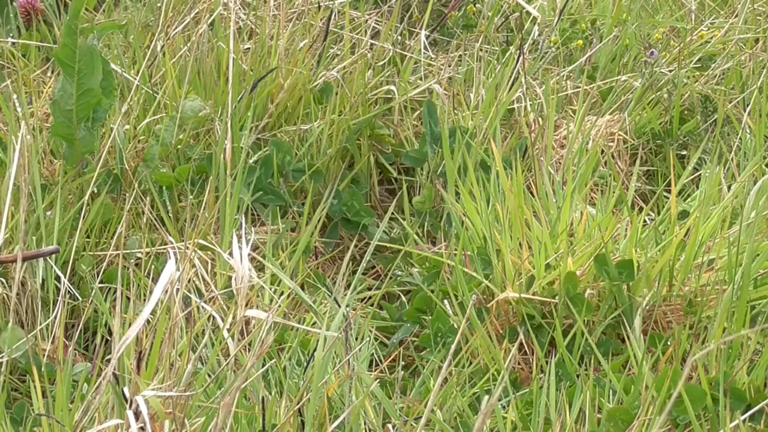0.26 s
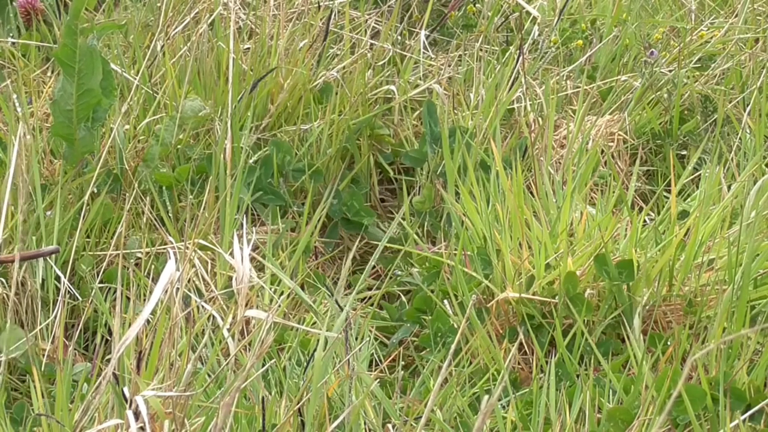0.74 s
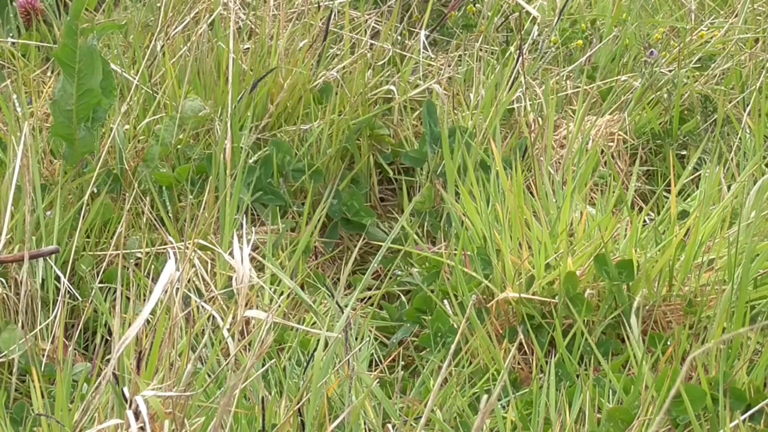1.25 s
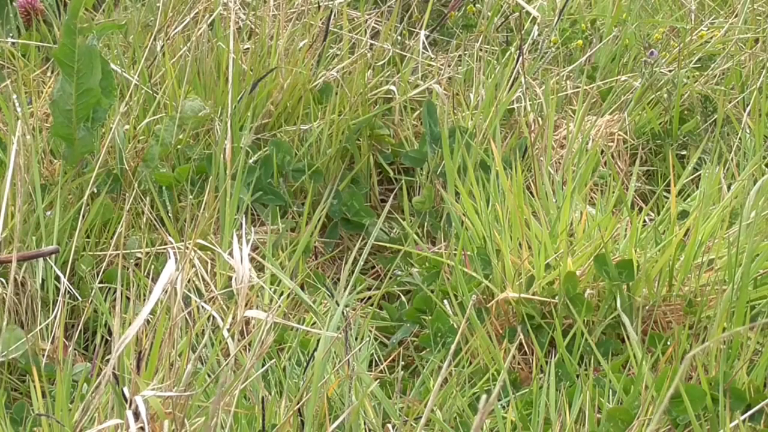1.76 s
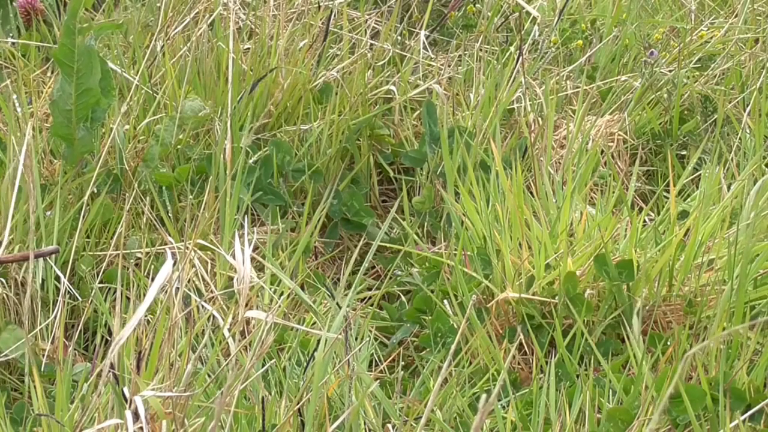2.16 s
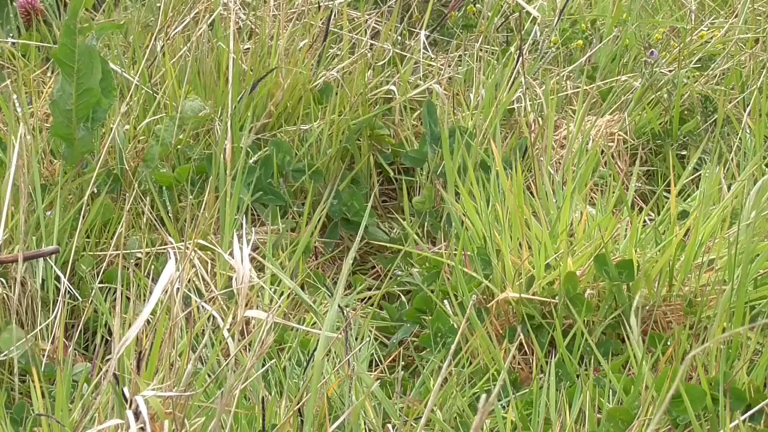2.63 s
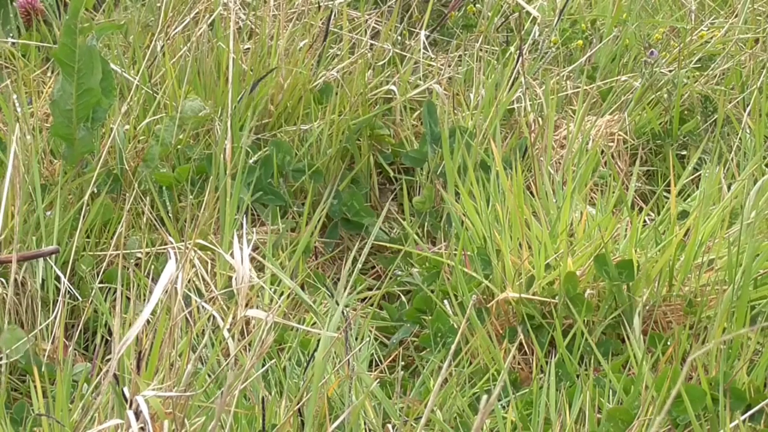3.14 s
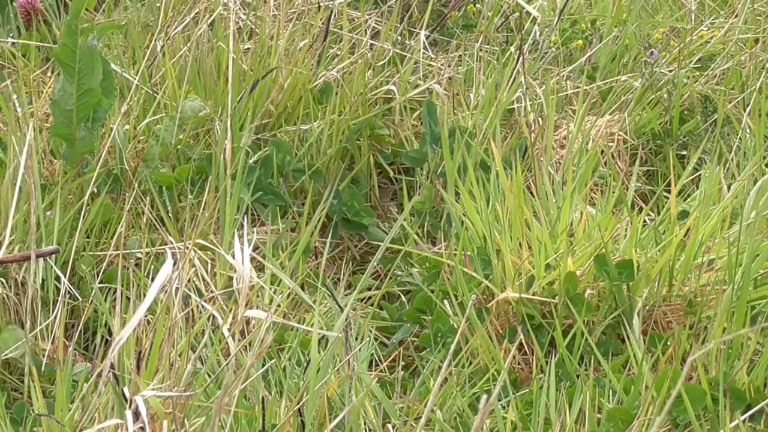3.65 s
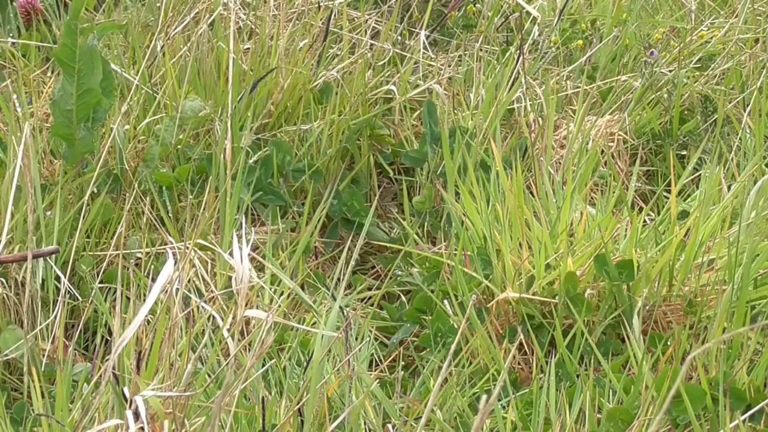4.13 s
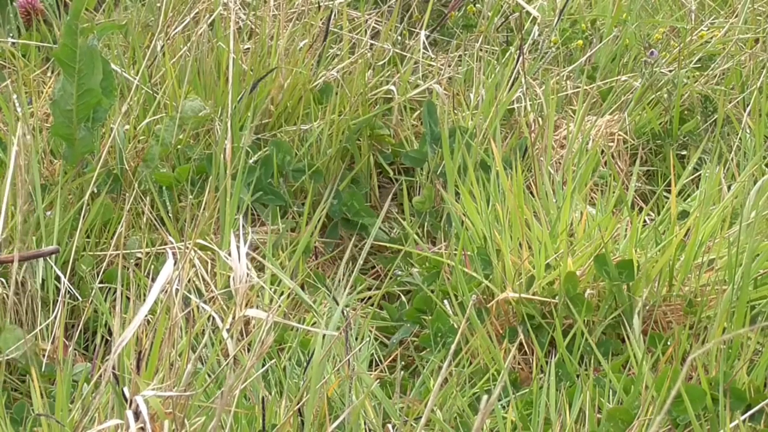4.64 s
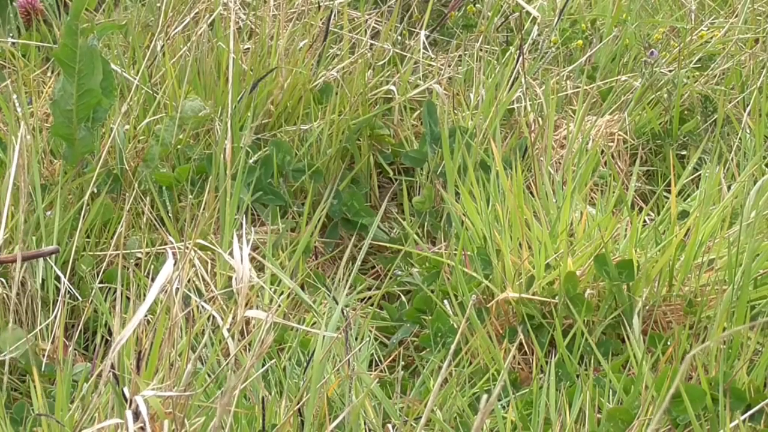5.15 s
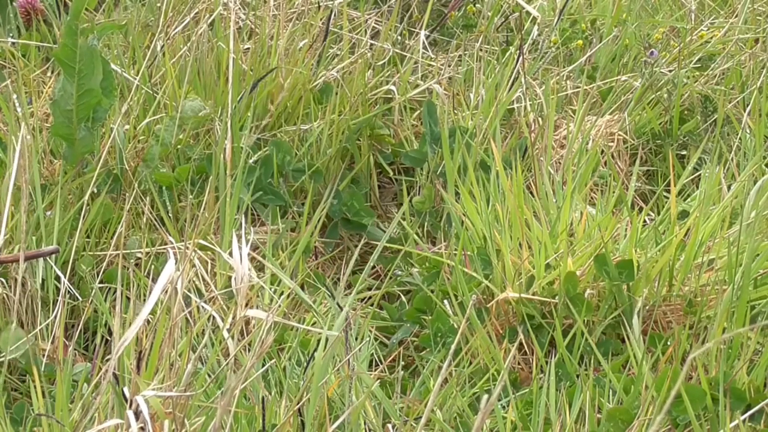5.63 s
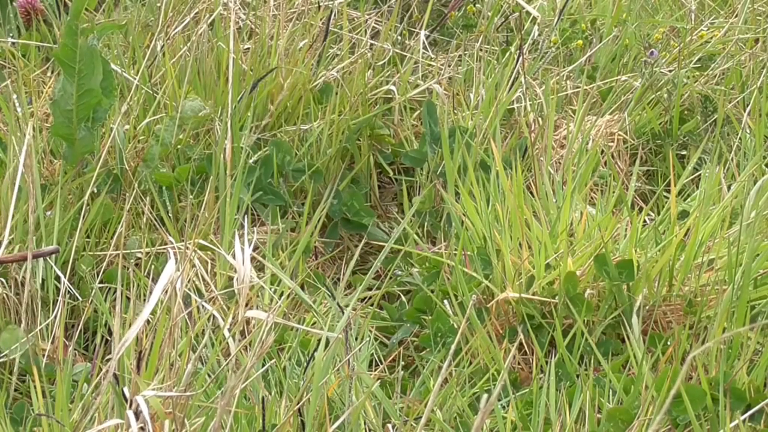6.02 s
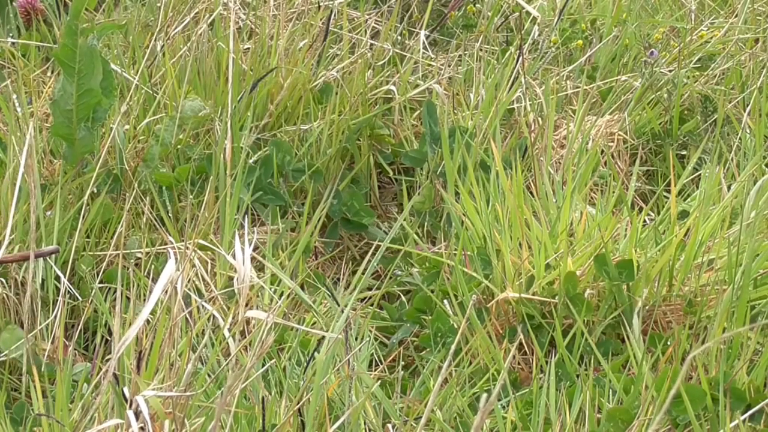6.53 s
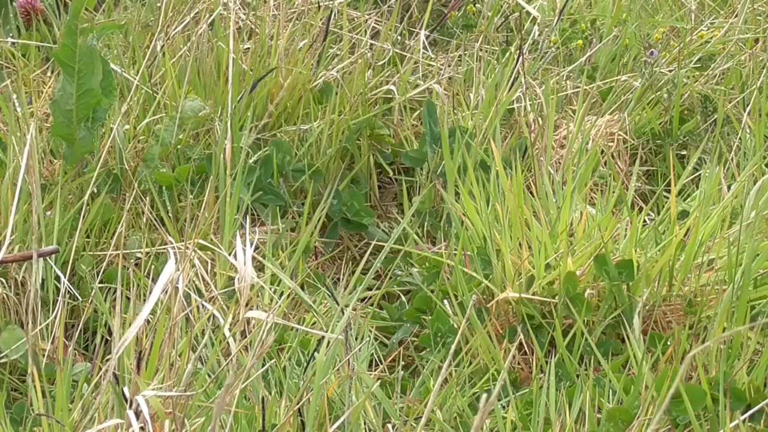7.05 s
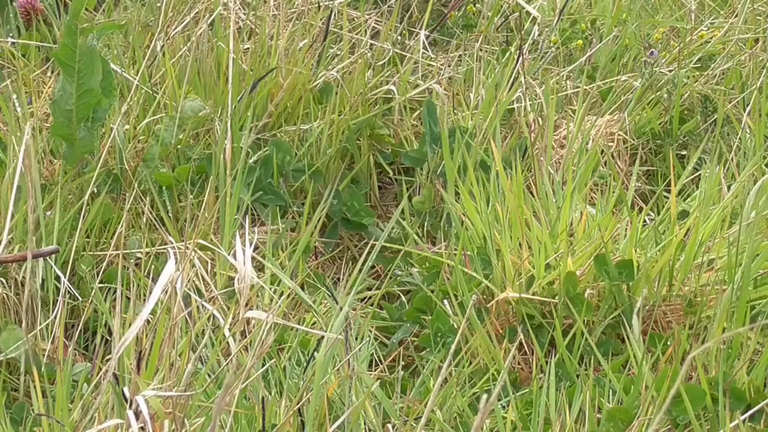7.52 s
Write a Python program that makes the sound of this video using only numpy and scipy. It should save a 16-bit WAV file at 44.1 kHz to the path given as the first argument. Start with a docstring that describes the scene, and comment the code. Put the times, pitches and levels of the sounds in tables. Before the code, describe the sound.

A lark sings fast trills and warbles over an open meadow, with low wind rumble and one strong gust on the microphone.

```python
"""Lark over a windy meadow

A lark whistles fast trills, slides and buzzes with its syrinx, a bird's voice box. A second bird
answers faintly from further off, and the grass scatters both songs. Distant air and grass hiss
below, and wind rumbles on the two microphone openings, with one strong gust."""
import sys
import numpy as np
from scipy import signal
from scipy.fft import rfft, irfft
from scipy.io import wavfile
from scipy.ndimage import uniform_filter1d

SR = 44100
rng = np.random.default_rng(int(sys.argv[2]) if len(sys.argv) > 2 else 0)


def wrap_up_sound(samples):
    """Save the sound to the file named by the first command line argument, as 16-bit audio."""
    columns = np.atleast_2d(samples).T
    # keep every value between -1 and 1, then stretch to whole-number steps
    tamed = np.clip(columns, -1, 1)
    steps = np.round(tamed * 32767).astype(np.int16)
    wavfile.write(sys.argv[1], SR, steps)


N = 343098
TIME = np.arange(N) / SR
BINS_HZ = np.maximum(np.arange(N // 2 + 1) * SR / N, 1)


def amp(db):
    """Turn a level in dB into a gain."""
    return 10 ** (np.asarray(db) / 20)


def at_hz(table, hz, column=1):
    """Read a table between its rows, on a log-frequency scale."""
    rows = np.array(table)
    return np.interp(np.log(hz), np.log(rows[:, 0]), rows[:, column])


def noise(spectrum, channels=2):
    """Noise of strength 1, shaped by a gain for each frequency."""
    shaped = irfft(spectrum * rfft(rng.standard_normal((channels, N))), N)
    return shaped / shaped.std()


def random_gain(rate_hz, depth_db):
    """A gain that wavers at random."""
    return amp(depth_db * noise(1 / (1 + (BINS_HZ / rate_hz) ** 2), channels=1)[0])


# Each row: frequency in Hz, relative strength of the hiss in dB.
AIR_SPECTRUM = [(260, -35), (450, -6.5), (900, -4), (1300, -9), (1760, -17.5), (2300, -15.5), (2800, -23.5),
                (4200, -22), (6000, -32), (8200, -21.5), (15600, -24.5)]
# Each row: frequency in Hz, left minus right in dB, likeness from 0 to 1, right's lead in radians.
AIR_STEREO = [(580, 3.5, 0.46, 1.9), (950, 1.5, 0.76, 1.7), (2040, -0.5, 0.16, 1.09), (7840, 1.5, 0, 13.3)]


def air(level_db=-60):
    """Distant air and grass hiss, partly alike in the left and right ears."""
    own, right = rfft(rng.standard_normal((2, N))) * amp(at_hz(AIR_SPECTRUM, BINS_HZ))
    alike = np.clip(at_hz(AIR_STEREO, BINS_HZ, column=2), 0, 1)
    lag = np.exp(-1j * at_hz(AIR_STEREO, BINS_HZ, column=3))
    left = amp(at_hz(AIR_STEREO, BINS_HZ)) * (alike * lag * right + np.sqrt(1 - alike ** 2) * own)
    hiss = irfft(np.array([left, right]), N)
    return amp(level_db) * hiss / hiss[1].std()


# Each row: time in seconds, rumble level in dB, whoosh level in dB, both on the left.
BREEZE_LEVELS = [(0, -58, -58), (.65, -49, -49), (1.4, -56.5, -55), (4.2, -53, -54), (4.8, -53.5, -49),
                 (7.2, -52, -50.5), (7.78, -52, -55)]
# Each row: frequency in Hz, relative strength of the rumble in dB.
RUMBLE_SPECTRUM = [(25, -19), (60, 4), (180, 7.5), (300, -11), (1500, -93)]


def breeze(hollow_hz=343.5, width_hz=95):
    """Swirling air rumbles at the microphone openings and whooshes in their hollows, mostly on the left."""
    times, rumble_db, whoosh_db = np.transpose(BREEZE_LEVELS)
    hollow = 1 / (1 + ((BINS_HZ - hollow_hz) / width_hz) ** 4)
    rumble = noise(amp(at_hz(RUMBLE_SPECTRUM, BINS_HZ))) * amp(np.interp(TIME, times, rumble_db))
    whoosh = noise(hollow) * amp(np.interp(TIME, times, whoosh_db)) * random_gain(8.6, 1.74)
    left, right = rumble * random_gain(5, 1.5) + whoosh
    return np.array([left, .095 * left + .36 * right])


def breathy_tone(hz=1420, width_hz=120, level_db=-60, end_s=.22):
    """A narrow band of noise fades out at the very start."""
    band = noise(1 / (1 + ((BINS_HZ - hz) / width_hz) ** 2))
    return amp(level_db) * np.clip(1 - TIME / end_s, 0, 1) ** .5 * band


# Each row: the overtone's frequency in Hz, its level against the note in dB.
LARK_OVERTONE = [(6200, -46), (10000, -21)]


def whistle(out, start, hz, level_db, overtone=LARK_OVERTONE):
    """The syrinx makes an almost pure tone, which is weaker and lags a little on the left."""
    first = int(start * SR)
    size = min(len(hz), N - first)
    hz, age = hz[:size], np.arange(size)
    gain = amp(level_db[:size]) * np.clip(np.minimum(age, size - age) / (.00084 * SR), 0, 1)
    phase = 2 * np.pi * np.cumsum(hz) / SR + rng.uniform(0, 2 * np.pi)
    left_db = at_hz([(2200, -7.5), (4500, -4.5)], hz)
    for side, lag_radians, side_db in ((0, 1.87, left_db), (1, .025, .097)):
        wave = np.sin(phase - lag_radians) + amp(at_hz(overtone, 2 * hz)) * np.sin(2 * phase - lag_radians)
        out[side, first:first + size] += gain * amp(side_db) * wave


def stroke(out, start, length, from_hz, to_hz, level_db, hook=0, curve=1, dim_db_per_semitone=0):
    """One breath of song: a quick bend in pitch, the hook, settles into a slide."""
    attack_s, release_s, hook_s = min(.0025, length / 2), min(.0035, length / 2), .001 + .07 * length
    t = np.arange(1, max(int(length * SR), 9)) / SR
    slide_hz = from_hz * (to_hz / from_hz) ** ((t / length) ** curve)
    hz = slide_hz * 2 ** (hook * np.exp(-t / hook_s) / 12)
    edge = np.clip(np.minimum(t / attack_s, (length - t) / release_s), 1e-4, 1)
    fade_db = 20 * np.log10(np.sin(np.pi / 2 * edge))
    semitones_below_top = 12 * np.log2(hz.max() / hz)
    whistle(out, start, hz, level_db + fade_db - dim_db_per_semitone * semitones_below_top)


def pitch_path(progress, first, middle, last):
    """Deep falls bend smoothly, levelling off or steepening; other trills follow an arc."""
    if first > 1.16 * last and first > middle > last:
        bend = 2 * np.log(np.log(first / middle) / np.log(middle / last)) + 1e-6
        return first * (last / first) ** (np.expm1(-bend * progress) / np.expm1(-bend))
    arc = np.polyfit([0, .5, 1], np.log([first, middle, last]), 2)
    return np.exp(np.polyval(arc, progress))


# Whatever starts in these spans is sung twice. Each row: start in seconds, end in seconds.
REPEAT_SPANS = [(1.2, 1.25), (1.48, 1.6), (4.16, 4.2), (4.64, 4.7)]
# For each span: how many seconds later its twin is sung (negative means earlier).
REPEAT_SHIFTS = [1.231, 1.232, .374, -0.378]


def with_repeats(rows):
    """Pair each row with a time shift of zero, then add the shifted repeats."""
    repeats = [(row, shift) for (start, end), shift in zip(REPEAT_SPANS, REPEAT_SHIFTS)
               for row in rows if start < row[0] < end]
    return [(row, 0) for row in rows] + repeats


# Each row: start and end in seconds, number of strokes, hurry (how early the middle comes, as a share
# of the trill), first, middle and last pitch in Hz, first and last level in dB, share of each beat that
# sounds, first and last slide in semitones, hook in semitones.
# Rows that overlap are the two sides of the syrinx taking turns.
LARK_TRILLS = [ (.037, 0.059, 3, 0, 4610, 4570, 4650, -33.5, -31, 0.91, 2, -0.5, 0),
               (0.07, 0.179, 6, 0.015, 4960, 4460, 3450, -35, -34, 0.57, -1, -1.5, 0),
               (0.218, 0.373, 8, -0.00097, 3900, 3980, 3830, -34.5, -34.5, 0.67, -1, -1.5, -1.5),
               (.444, 0.478, 5, 0.0056, 2750, 2800, 2800, -45.5, -41, 0.87, 8, 9, 0),
               (0.49, 0.529, 3, 0, 4030, 4130, 3760, -33, -36, 0.54, 1, -1, -0.5),
               (0.536, .617, 4, 0.019, 2990, 2140, 1850, -39, -51.5, 0.42, -2.5, -2, 3),
               (0.656, .931, 13, 0.0039, 4520, 4950, 4880, -39, -36, .33, .5, .2, -2.5),
               (0.663, .915, 12, -0.0011, 3670, 3980, 3940, -44.5, -42.5, 0.64, -5, -6.5, 0),
               (1.205, 1.229, 3, 0, 4350, 4220, 4150, -41.5, -41, 0.8, .7, -.7, -1),
               (1.239, 1.424, 12, 0, 3750, 3200, 3100, -41, -41, .55, 2, .3, -2.5),
               (1.246, 1.43, 12, 0, 3300, 2850, 2750, -56, -43, .35, -4, -6, 0),
               (1.627, 1.935, 9, -0.0034, 4080, 4680, 4870, -40, -35.5, 0.23, 1.8, .8, -1),
               (1.636, 1.944, 9, -0.004, 3890, 4590, 4820, -41, -42.5, 0.46, .7, .2, -3.5),
               (1.968, 2.072, 6, 0.0023, 3920, 2354, 2090, -38, -47.5, 0.65, 2, 0, 0),
               (2.867, 3.16, 9, -0.016, 4000, 4780, 4980, -37, -37, .23, 2.5, .8, -1.5),
               (2.876, 3.166, 9, -0.014, 3920, 4780, 4860, -39, -42, 0.46, 1, -.5, -4),
               (3.2, 3.322, 7, 0.032, 4150, 2350, 2110, -39, -48, 0.7, 2.5, -1.5, 0.5),
               (3.424, 3.498, 4, 0, 4130, 4020, 3930, -47, -44, 0.45, 5.5, 4, -0.5),
               (3.432, 3.486, 3, 0, 5040, 5020, 5050, -47, -40.5, .5, -1.5, -1.5, 1.5),
               (3.503, 3.712, 13, 0.016, 4790, 3470, 2550, -37, -44, 0.65, -0.5, 1, -1),
               (3.798, 4.12, 6, -0.0068, 2770, 2825, 2920, -48.5, -50, 0.66, -0.2, -1.2, 0.5),
               (3.832, 4.103, 5, -0.026, 3300, 3650, 3650, -46, -45, .09, 8, 9, 0),
               (3.836, 4.107, 5, -0.026, 3830, 4000, 3980, -42, -41, .22, -1.5, -2.5, 2.5),
               (4.17, 4.252, 4, -0.0021, 3020, 2650, 2380, -43.5, -41, 0.27, -2, -5, 0.5),
               (4.177, 4.256, 4, -0.0077, 3030, 2650, 2250, -38, -47, .3, -5.5, -2, 2),
               (4.892, 5.148, 15, 0.0056, 3384, 3203, 2974, -41, -42, 0.82, 0, 0.5, -0.5),
               (5.212, 5.274, 6, 0.025, 4310, 4370, 4450, -42, -37.5, 1, 3.5, .5, -2),
               (5.315, 5.351, 4, 0, 3520, 3540, 3410, -41.5, -38.5, .8, 1.5, 1.5, 0.5),
               (5.701, 5.73, 3, 0, 3440, 3410, 3220, -43.5, -39.5, 0.77, 1, 3, 1),
               (5.735, 5.819, 5, 0, 3040, 2650, 2370, -44, -46.5, 0.65, 6, 5.5, 0),
               (5.925, 5.953, 3, 0, 4270, 3900, 3700, -42.5, -37, 0.72, 4, -1.5, -0.5),
               (5.956, 6.292, 18, 0.041, 3620, 3270, 2850, -34, -52, .45, .5, 4, -7),
               (6.051, 6.286, 12, 0.012, 2750, 2420, 2280, -45, -44, .52, 6.5, 9, 0),
               (6.348, 6.444, 9, 0.0023, 5000, 5020, 5030, -43, -43.5, 0.87, -.5, -2, -1),
               (6.521, 6.577, 5, -0.024, 4080, 3580, 3750, -41, -36, .5, -9, -10, -1),
               (6.643, 6.725, 7, 0, 5500, 5140, 4930, -49.5, -42, 0.9, 2.5, 2.5, 0.5),
               (6.795, 6.84, 3, -0.0097, 5140, 4940, 4870, -39.5, -42.5, 0.85, 0.5, -1, 0),
               (6.847, 6.954, 5, -0.008, 4700, 4390, 4350, -32, -35, 0.37, -2, -5.5, 0),
               (6.987, 7.206, 13, -0.00056, 4890, 4554, 4110, -38, -40.5, 0.77, .5, 1, -1),
               (7.267, 7.389, 5, -0.025, 3060, 4180, 4210, -40.5, -43, 0.97, -2.5, -2, -0.5), ]
UNEVEN_DB, UNEVEN_SEMITONES = 1.56, .1


def lark_trills():
    """The lark repeats a stroke quickly along a pitch path, a little differently each time."""
    out = np.zeros((2, N))
    for row, shift in with_repeats(LARK_TRILLS):
        start, end, count, hurry, *pitches, first_db, last_db, share, first_slide, last_slide, hook = row
        count = round(count)
        beat = np.arange(count + 1) / count
        onsets = shift + start + (end - start) * (beat - 4 * hurry * beat * (1 - beat))
        pitch_luck, level_luck = rng.standard_normal((count, 2)).T
        centre_hz = pitch_path(np.linspace(0, 1, count), *pitches)
        centre_hz *= 2 ** (UNEVEN_SEMITONES * pitch_luck / 12)
        slides = np.linspace(first_slide, last_slide, count)
        levels = np.linspace(first_db, last_db, count) + UNEVEN_DB * level_luck
        for onset, gap, hz, slide, level_db in zip(onsets, np.diff(onsets), centre_hz, slides, levels):
            # Falls are nearly straight, small rises round off, big leaps start slowly.
            curve = .9 if slide < 0 else .6 if slide < 6 else 1.9
            half_slide = 2 ** (slide / 24)
            stroke(out, onset, share * gap, hz / half_slide, hz * half_slide, level_db,
                   hook, curve, dim_db_per_semitone=.35)
    return out


def grass_scatter(song, level_db=-12, die_away_s=.08):
    """The ground and stalks send back a short, blurred echo."""
    t = TIME[:int(.2 * SR)]
    tail = rng.standard_normal((2, len(t))) * amp(-60 * t / die_away_s) * (t > .004)
    tail /= np.sqrt(np.sum(tail ** 2, axis=1, keepdims=True))
    return amp(level_db) * signal.fftconvolve(song, tail, axes=1)[:, :N]


def sizzle(song, relative_db=-26, above_hz=7000):
    """A high hiss swells with the loud notes."""
    loudness = uniform_filter1d(np.abs(song), size=200, axis=1)
    return amp(relative_db) * loudness * noise(BINS_HZ > above_hz)


# Each row: start and end in seconds, first and last pitch in Hz, peak level in dB.
FAR_BIRD_NOTES = [(.82, .93, 5770, 5470, -57), (0.923, 0.98, 4930, 4600, -50),
                  (4.69, 4.722, 4800, 4170, -58), (5.85, 5.963, 2240, 2000, -63),
                  (6.974, 7.063, 6000, 5800, -60), (3.246, 3.342, 5720, 5360, -65),
                  (3.339, 3.396, 5100, 4470, -55.5), (4.099, 4.205, 5770, 5200, -58.5),
                  (4.208, 4.255, 4960, 4570, -49.5), (5.863, 5.973, 5700, 5450, -57.5),
                  (5.968, 6.014, 4990, 4460, -46.5), (6.434, 6.497, 5370, 5500, -58),
                  (6.537, 6.595, 4960, 4520, -46), (7.132, 7.19, 5870, 5680, -57)]


def far_bird(warble_hz=95, warble_depth=.07, warble_above_hz=5200):
    """Soft, mostly falling whistles swell and fade; the high ones warble ever wider."""
    out = np.zeros((2, N))
    for start, end, first_hz, last_hz, peak_db in FAR_BIRD_NOTES:
        progress = np.linspace(.01, .99, int((end - start) * SR))
        depth = warble_depth * progress * (first_hz > warble_above_hz)
        warble = 1 + depth * np.sin(2 * np.pi * warble_hz * progress * (end - start))
        hz = (first_hz + (last_hz - first_hz) * progress) * warble
        swell_db = 6 * np.log10(np.sin(np.pi * progress))
        whistle(out, start, hz, peak_db + swell_db, overtone=[(1, -99)])  # a pure tone
    return out


# Each row: start and length in seconds, the slide's first and last pitch in Hz, level in dB,
# and sometimes a hook in semitones.
LARK_NOTES = [ (0.975, 0.15, 4390, 4200, -42, 5), (1.491, .02, 3140, 3190, -44),
              (1.507, .026, 4550, 4200, -44, -6), (1.541, 0.0087, 3700, 3500, -41),
              (1.549, 0.0095, 3400, 2100, -50), (1.562, 0.013, 2200, 2010, -48.5),
              (2.146, 0.23, 4050, 3700, -40, 6.5), (3.778, 0.0041, 2490, 2920, -40.5),
              (3.782, 0.017, 3560, 3610, -40), (4.649, 0.025, 3800, 3867, -40.5, -11),
              (4.679, 0.013, 3200, 2120, -46), (4.694, .011, 2150, 2000, -49),
              (5.349, 0.047, 3480, 3410, -37.5), (5.438, 0.018, 3540, 3360, -39.5),
              (5.449, .01, 3450, 2010, -49.5), (5.461, 0.024, 4300, 4700, -41, -9),
              (5.498, 0.0094, 4840, 4840, -37.5), (5.516, 0.012, 3350, 3120, -42.5),
              (5.526, 0.0091, 3100, 2100, -47), (5.536, 0.015, 2250, 2250, -46.5, -2),
              (5.594, .044, 3410, 4770, -39.5), (5.64, 0.013, 5190, 4100, -37.5),
              (6.333, 0.012, 4470, 4860, -48, -2), (6.605, 0.033, 4970, 4790, -41, -0.5),
              (6.776, 0.013, 6800, 5700, -48.5), (7.425, 0.12, 5010, 5060, -42, -1),
              (7.593, 0.0096, 4500, 4800, -38, -0.5), (7.601, 0.013, 4580, 3610, -42.5),
              (7.626, 0.0055, 4400, 5200, -39), (7.635, 0.0096, 5600, 5550, -48.5, -2),
              (7.647, 0.023, 5100, 4870, -43.5), (7.67, 0.025, 4450, 3980, -40.5),
              (7.695, .023, 3210, 3167, -40), (7.719, 0.015, 2200, 2650, -49, 3.5), ]


def lark_notes():
    """The lark sings single strokes between its trills."""
    out = np.zeros((2, N))
    for (start, *note), shift in with_repeats(LARK_NOTES):
        stroke(out, start + shift, *note)
    return out


# Each row: time in seconds, level in dB.
GUST_LEVELS = [(2.699, -48), (2.898, -29.5), (3.05, -18), (3.15, -26.5), (3.33, -24), (3.45, -36.5),
               (3.63, -33), (3.75, -39.5), (3.92, -35), (4.3, -46)]
# Each row: frequency in Hz, relative strength of the gust in dB.
GUST_SPECTRUM = [(25, -25), (90, 3), (160, -0.5), (380, -22), (1000, -47.5), (2000, -96)]


def gust():
    """A gust presses on the two microphone openings, pushing left and right in opposite directions."""
    times, level_db = np.transpose(GUST_LEVELS)
    push, own = noise(amp(at_hz(GUST_SPECTRUM, BINS_HZ)))
    pressure = np.array([-.85 * push + .5 * own, push]) * random_gain(15, 1)
    return pressure * amp(np.interp(TIME, times, level_db, left=-99, right=-99))


def thump(at_s=3.045, level_db=-48, fade_s=.02, top_hz=600):
    """At its height the gust slaps the microphone once, with a dull burst."""
    burst = np.exp(-np.abs(TIME - at_s) / fade_s)
    return amp(level_db) * burst * noise(1 / (1 + (BINS_HZ / top_hz) ** 2))


# Each row: start and end in seconds, number of swings, first and last pitch in Hz, peak level in dB.
LARK_BUZZES = [(4.371, 4.479, 14.2, 4700, 4180, -34), (4.752, 4.844, 13., 4550, 4300, -37)]


def lark_buzzes(swing_semitones=2.2, skew=.8, slowing=.04, dip_db=4):
    """One unbroken whistle climbs and drops back very fast, softer at the bottom of each swing."""
    out = np.zeros((2, N))
    for start, end, swings, first_hz, last_hz, peak_db in LARK_BUZZES:
        progress = np.linspace(.01, .99, int((end - start) * SR))
        arch = np.sin(np.pi * progress)
        turn = 2 * np.pi * swings * (progress + slowing * arch) - np.pi / 2
        swing = np.sin(turn - skew * np.sin(turn))
        hz = (first_hz + (last_hz - first_hz) * progress) * 2 ** (swing_semitones * swing / 12)
        uneven_db = np.interp(progress, np.linspace(0, 1, 16), UNEVEN_DB * rng.standard_normal(16))
        swell_db = 9 * np.log10(arch)
        whistle(out, start, hz, peak_db + uneven_db + swell_db - dip_db * np.maximum(-swing, 0) ** 2)
    return out


def scene():
    """Both birds, with a slight rough smear around each note, over air and wind."""
    song = lark_trills() + lark_notes() + lark_buzzes() + far_bird()
    song *= random_gain(rate_hz=350, depth_db=1.3)
    return song + grass_scatter(song) + sizzle(song) + air() + breeze() + gust() + thump() + breathy_tone()


def record(dry, cutoff_hz=15780):
    """The highest treble is cut off steeply."""
    return signal.sosfilt(signal.ellip(12, .5, 60, cutoff_hz, fs=SR, output="sos"), dry)


dry = scene()
out = record(dry)
wrap_up_sound(out)
```